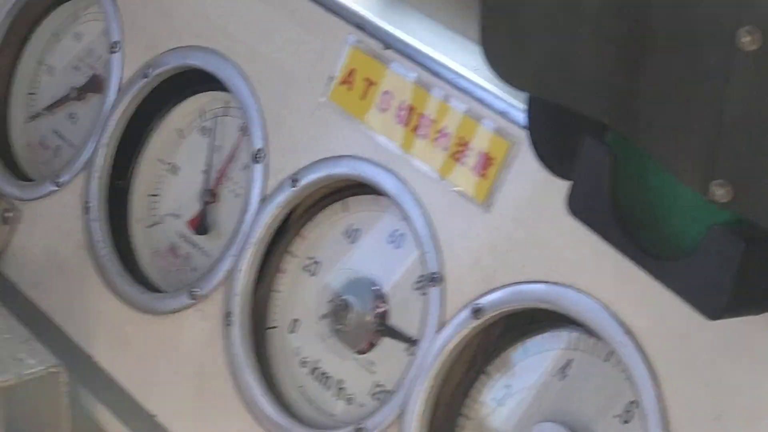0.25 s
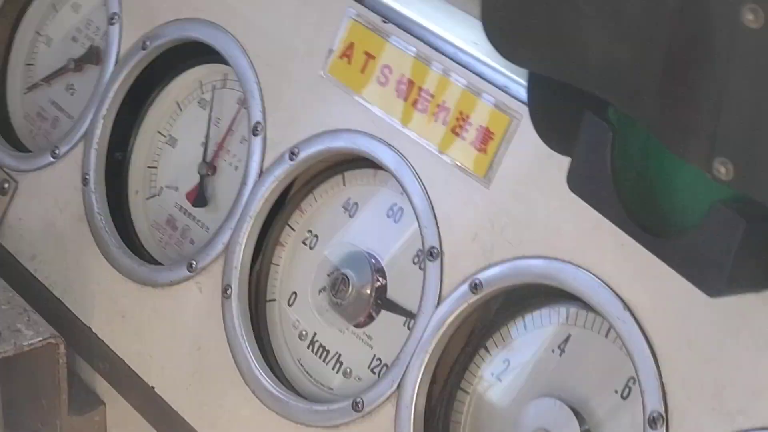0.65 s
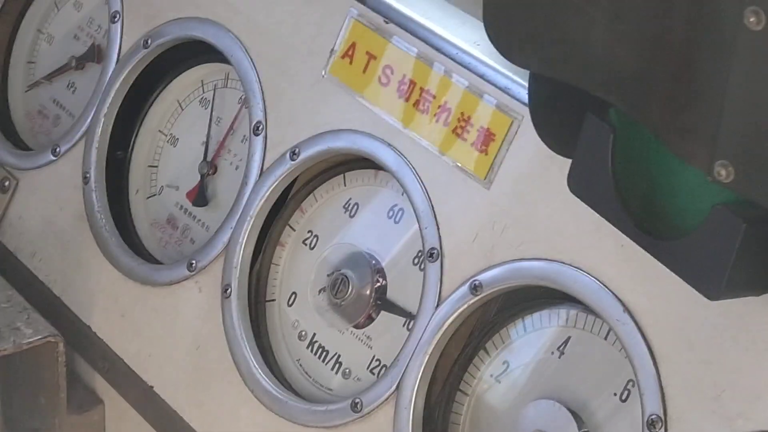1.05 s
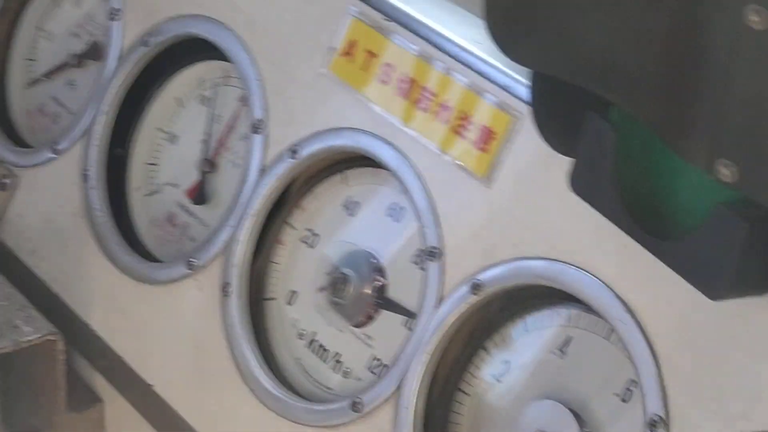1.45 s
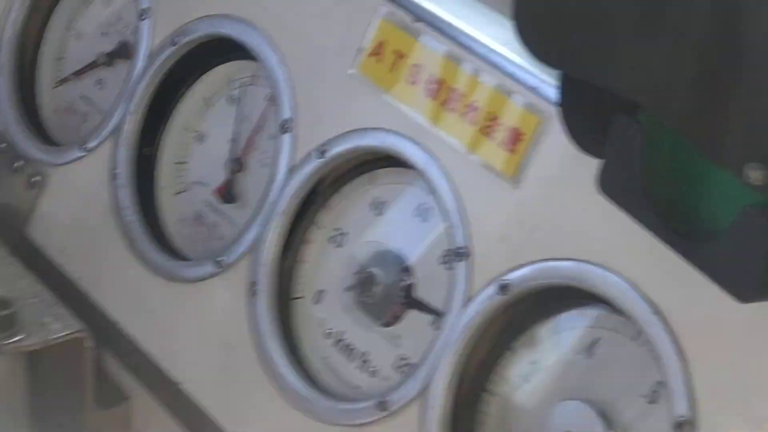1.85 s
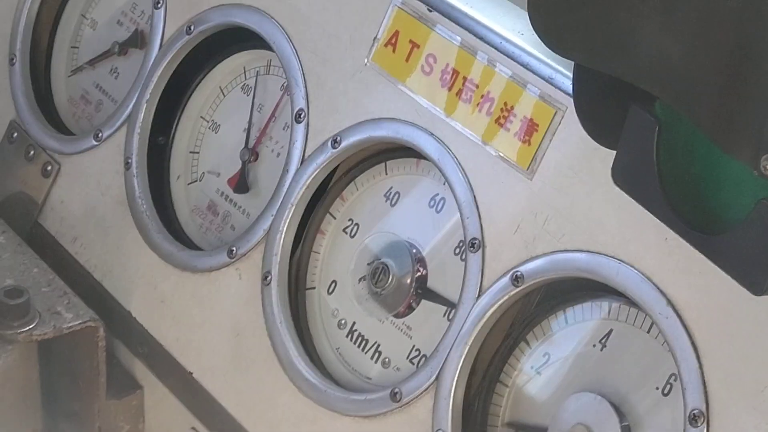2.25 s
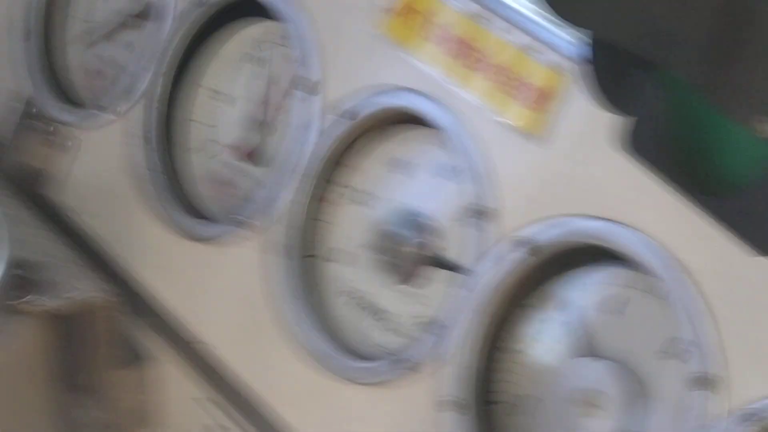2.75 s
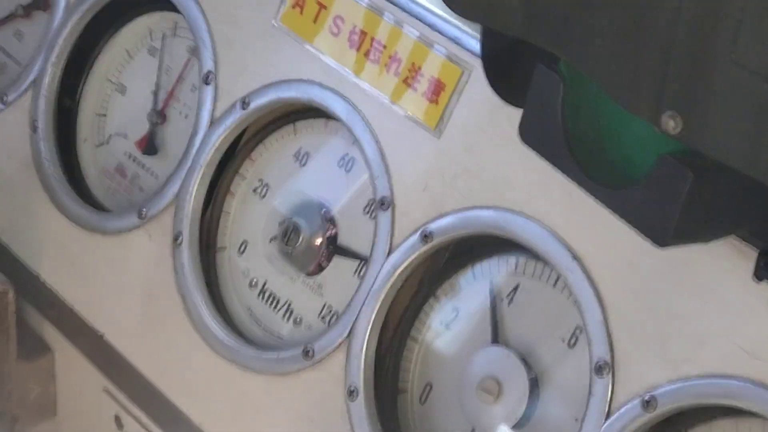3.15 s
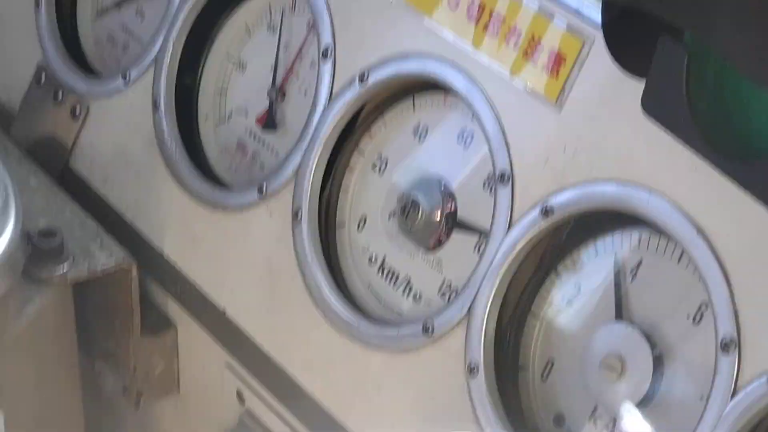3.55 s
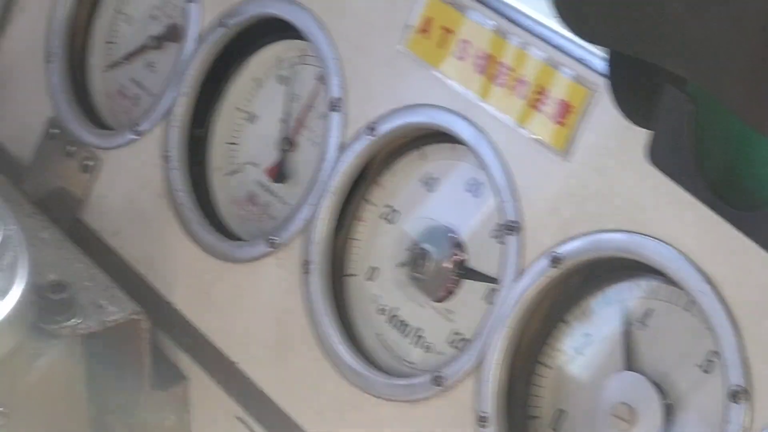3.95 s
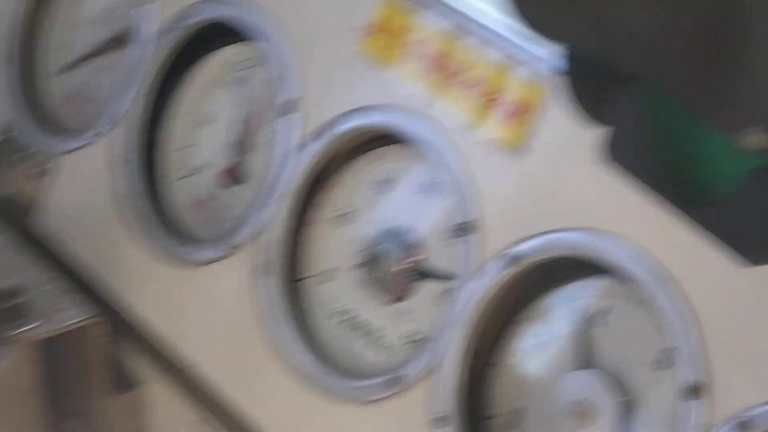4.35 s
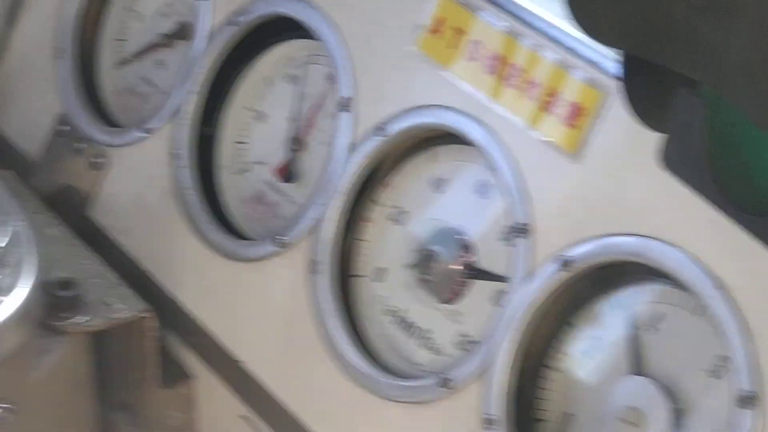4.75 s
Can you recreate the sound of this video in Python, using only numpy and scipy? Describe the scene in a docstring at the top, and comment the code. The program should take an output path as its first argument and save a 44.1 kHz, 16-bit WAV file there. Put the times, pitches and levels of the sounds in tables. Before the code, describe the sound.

An electric train runs fast, heard on board: steady wheel roar, a growling, slowly falling whine, irregular rail thumps and close metallic rattles.

```python
"""Wheels roar on rough rail, heard in the cab of an electric train running fast and slowly losing speed.
Rail joints thump up through the car body. The gears of two axles whine at close, falling pitches.
Loose metal fittings clatter and small things tick close to the microphone.
Underneath, small parts buzz, the steel wheels ring and faint ticks rustle."""
import sys
import numpy as np
from scipy import signal
from scipy.fft import rfft, irfft
from scipy.io import wavfile
from scipy.ndimage import uniform_filter1d, minimum_filter1d

SR = 44100
rng = np.random.default_rng(int(sys.argv[2]) if len(sys.argv) > 2 else 0)


def wav_record(signal):
    """Record a signal, one row per channel, as 16-bit PCM in the file named by sys.argv[1]."""
    frames = np.transpose(np.atleast_2d(signal))
    bounded = np.clip(frames, -1, 1)
    # unit amplitude maps onto the largest positive 16-bit level
    quanta = np.round(bounded * 32767).astype(np.int16)
    wavfile.write(sys.argv[1], SR, quanta)


N = 221249
TIME = np.arange(N) / SR


# Rolling noise. Each row: frequency in Hz, relative density in dB.
ROLL_SPECTRUM = [(15, -35), (25, -14), (75, -3), (188, -3.5), (274, -4.5), (741, -3.5), (804, -8),
                 (1300, -12.5), (1660, -15), (4150, -27.5), (4870, -36.5), (9050, -51.5), (10400, -58.5),
                 (12800, -53), (15500, -78)]
# Cab resonances. Each row: centre in Hz, width in Hz, gain in dB.
CAB_RESONANCES = [(74.6, 27, 5.5), (247.2, 98, 12.5), (373, 138, 11), (870, 70, 4), (2510, 59, 3.5),
                  (4710, 44, 7), (5830, 130, 7), (8970, 710, 6.5), (10070, 990, -15)]

def rolling():
    """Rough wheels on rough rail shake the cab; five bands swell and flutter with the track."""
    hz, field = cab_noise(ROLL_SPECTRUM, size=N)
    cab_db = sum(db / (1 + (2 * (hz - f) / width) ** 2) for f, width, db in CAB_RESONANCES)
    field = rfft(shimmer(irfft(field * amp(cab_db), N)))
    rough_db, bass_db, treble_db = track()
    bands = [(0, 150, -30.5 + bass_db, 1.6),  # body rumble
             (150, 450, -25 + .89 * rough_db, 1.5),  # floor drone
             (450, 1100, -27.5 + rough_db, 1),  # wheel roar
             (1100, 5000, -35 + .914 * rough_db, .8),  # rail hiss
             (5000, SR, -50.5 + treble_db, 1.4)]  # airy treble
    out = np.zeros((2, N))
    for low_hz, high_hz, level_db, flutter_db in bands:
        band = unit(irfft(field * ((hz >= low_hz) & (hz < high_hz)), N))
        out += band * amp(level_db + flutter_db * wander(hz=15.6))
    return out


# Shimmer of the rolling noise. Each row: frequency in Hz, rms depth in dB.
SHIMMER_DEPTH = [(300, .5), (1000, 2), (1800, 3.6), (9000, 3.8)]

def shimmer(x):
    """Narrow bands of the rolling noise swell and fade at random, about ten times a second."""
    frames = dict(fs=SR, nperseg=1024, noverlap=768)
    hz, _, spectra = signal.stft(x, **frames)
    patches = uniform_filter1d(rng.standard_normal(spectra.shape[1:]), size=3, axis=0)
    patches = unit(uniform_filter1d(patches, size=18, axis=1))
    swell_db = read(SHIMMER_DEPTH, hz)[:, None] * patches
    return signal.istft(spectra * amp(swell_db), **frames)[1][:, :N]


# Track under the car. Each row: time in seconds, roughness in dB, bass in dB, treble in dB.
TRACK_STATE = [(0.0, -19.5, -25, -49), (0.4, -19.5, -30, -48), (0.6, -21, -21.5, -47),
               (0.76, -18.5, -22.5, -47.5), (0.82, -21.5, -27, -52.5), (0.89, -22.5, -33.5, -51),
               (1.01, -23.5, -29, -52), (1.38, -26, -31, -47), (1.79, -27, -31.5, -55.5),
               (1.99, -26.5, -36, -52.5), (2.11, -32.5, -44, -52.5), (2.28, -30.5, -43, -56.5),
               (2.63, -32.5, -39.5, -59), (2.89, -27.5, -26, -53), (3.18, -30, -38, -50),
               (3.41, -32.5, -37, -53.5), (3.73, -31, -40.5, -57.5), (4.02, -26, -33.5, -56.5),
               (4.22, -26, -31.5, -52), (4.56, -27.5, -31, -52), (4.88, -28, -35, -53.5),
               (5.02, -23.5, -30.5, -54.5)]

def track():
    """Rail roughness, bass and treble, in dB about their averages."""
    return [db - db.mean() for db in follow(TRACK_STATE)]


# Wheels striking joints and uneven rail.
# Each row: start in seconds, boom peak in dB, boom pitch in Hz, knock in dB relative to that peak.
WHEEL_BLOWS = [(0.478, -11, 342, -5), (0.739, -8, 328, -3), (0.799, -6, 305, -8), (0.843, -10, 320, -21),
               (0.940, -7, 266, -11), (0.985, -11.5, 330, -1.5), (1.008, -1.5, 233, -16.5),
               (1.185, -3, 255, -11.5), (1.204, -11.5, 393, -10), (1.226, -9, 284, -22),
               (1.374, -7, 226, -14.5), (1.394, -9, 258, -11), (1.458, -10.5, 243, -22),
               (1.862, -13.5, 392, -27), (1.937, -5, 263.5, -7.5), (1.959, -11, 364, -2.5),
               (2.004, -3, 275, -8.5), (2.020, -2.5, 287, -20), (2.026, -7, 446, -11),
               (2.191, -4, 289, -11.5), (2.28, -10.5, 247, -16.5), (2.302, -16.5, 373, -2.5),
               (2.881, -3.5, 247, -19), (2.946, 0, 259, -21), (2.973, -10.5, 297, -23),
               (3.133, -8.5, 190, -17), (3.148, -10.5, 285, -16), (3.222, -11, 218, -24),
               (3.85, -16, 264, -11), (4.035, -7.5, 305, -5), (4.053, -10.5, 264, -13),
               (4.220, -4, 303, -10), (4.244, -4, 251, -28), (4.382, -19.5, 308, 0), (4.635, -7, 256, -4),
               (4.708, -21.5, 187, 3.5), (4.949, -15, 310, -4.5)]
# Hard knock. Each row: frequency in Hz, relative density in dB.
KNOCK_SPECTRUM = [(60, -27), (160, -31), (260, -24), (400, 11), (600, 4), (900, -1.5), (1400, -11.5),
                  (3000, -20), (7000, -36), (15000, -80)]
# Floor shudder. Each row: frequency in Hz, relative density in dB.
SHUDDER_SPECTRUM = [(25, -12), (65, -10), (105, 0), (180, -20.5), (600, -87)]

def joints():
    """Each wheel drops with a knock: the car body booms and the floor shudders a moment later."""
    t, out = np.arange(SR // 2) / SR, np.zeros((2, N))
    for start_s, db, hz, knock_db in WHEEL_BLOWS:
        boom_t60_s = .11 * np.exp(-.057 * db)  # harder blows die faster
        knock = amp(knock_db) * burst(KNOCK_SPECTRUM, t, t60_s=.19, rise_s=.0053)
        add(out, start_s, amp(db) * (boom(t, hz, boom_t60_s) + knock))
        shudder = burst(SHUDDER_SPECTRUM, t, t60_s=.14, rise_s=.0094)
        add(out, start_s + .0134, amp(db - 17.5) * shudder)
    return out


# Car body modes. Each row: frequency in Hz, level in dB, relative decay time.
BODY_MODES = [(185, -2.5, 0.097), (218.4, -1, .15), (241.7, -3.5, 0.17), (273.8, 0.5, 0.2),
              (310.6, 0.5, .11), (382, -3.5, .22), (487, -2, .12), (560, -13, .07)]

def boom(t, hz, t60_s):
    """The car body rings in the modes near the blow's pitch; peak 1."""
    rise_s, shake_db = .0046, 2.5
    mode_hz, mode_db, mode_decay = np.transpose(BODY_MODES)[:, :, None]
    mode_t60_s = t60_s * mode_decay / mode_decay.max()
    excitation = 1 / (1 + (np.log(mode_hz / hz) / .15) ** 2)
    detune = 1 + .02 * rng.standard_normal(mode_hz.shape)
    shake = uniform_filter1d(rng.standard_normal((len(BODY_MODES), len(t))), size=500)
    shake = unit(uniform_filter1d(shake, size=100))  # the rubbing wheel keeps shaking each mode
    decay = amp(mode_db + shake_db * shake - 60 * t / mode_t60_s)
    ring = (excitation * decay * np.sin(2 * np.pi * mode_hz * detune * t)).sum(0)
    ring *= 1 - np.exp(-(t / rise_s) ** 2)
    # panels radiate little below their first mode
    ring = signal.sosfilt(signal.butter(4, 170, "highpass", fs=SR, output="sos"), ring)
    return ring / abs(ring).max()


# Gear mesh of the near axle. Each row: time in seconds, frequency in Hz.
MESH_PITCH = [(0, 827.5), (1, 824.5), (1.8, 820.5), (2.5, 816), (2.95, 810.5), (3.85, 797.5), (4.4, 789.5),
              (5.02, 782)]
# Multiples of the mesh frequency: near axle, far axle, near octave, far octave.
MESH_ORDERS = [1, .974, 2, 1.949]
# Gear tones. Each row: time in seconds, then near axle, far axle and near octave in dB.
MESH_LEVELS = [(0, -35, -39, -39), (.2, -29.5, -39, -33.5), (.42, -39, -37, -31.5),
               (.65, -29.5, -29.5, -36), (.95, -38, -29, -35.5), (1.27, -36.5, -41, -43),
               (1.75, -35, -31, -34.5), (2, -38, -39, -40), (2.32, -45, -54, -54), (2.6, -37, -44, -55),
               (2.93, -31, -39, -48), (3.15, -40, -49, -48), (3.45, -38.5, -40, -52),
               (3.85, -32.5, -41, -43.5), (4.2, -28, -36, -52), (4.45, -34, -44, -51),
               (4.78, -30.5, -36, -46), (5.02, -36, -39, -48)]
# Fainter tones of drive and wheels.
# Each row: midpoint in seconds, length in seconds, multiple of the mesh, level in dB, waver as a fraction.
PASSING_TONES = [(1.5, .35, .835, -37, .004), (2.92, .3, 1.05, -35, .022), (3.7, 1.15, 1.115, -41, .005),
                 (4.784, 0.69, 1.04, -35.5, .008)]
# Standing wave in the cab. Each row: frequency in Hz, phase between the microphones in radians.
STANDING_WAVE = [(750, 0), (900, .2), (1500, -2.1), (1700, -2.1)]

def gears():
    """Two axles with slightly unequal wheels mesh at close pitches and beat into a growl."""
    mesh_hz, = follow(MESH_PITCH)
    near_db, far_db, octave_db = follow(MESH_LEVELS)
    levels_db = [near_db, far_db, octave_db, far_db - 13]
    tones = [(order, db, .003 / order) for order, db in zip(MESH_ORDERS, levels_db)]
    for middle_s, length_s, order, db, waver in PASSING_TONES:
        fade_db = 20 * (2 * (TIME - middle_s) / length_s) ** 4
        tones.append((order, db - fade_db, waver))
    out = np.zeros((2, N))
    for order, level_db, waver in tones:
        # uneven tooth contact roughens pitch and strength
        cycles = np.cumsum(order * mesh_hz * (1 + waver * wander(hz=30))) / SR
        strength = amp(np.maximum(level_db, -120) + 2.3 / order * wander(hz=25))
        # the swaying car shifts the standing wave
        apart_rad = read(STANDING_WAVE, order * mesh_hz) + .35 * wander(hz=4)
        out += np.sqrt(2) * np.sin(2 * np.pi * cycles + np.array([apart_rad, -apart_rad]) / 2) * strength
    return out * amp([[1.2], [-.4]])  # slightly left


# Clatters. Each row: start in seconds, level in dB, crash t60 in seconds, factor on the crash's
# frequencies, part name, ring in dB relative to the crash.
CLATTERS = [(0.9849, -21, 0.17, 0.46, "dull", -25), (1.298, -28.5, 0.44, 0.77, "bright", -19),
            (1.4647, -29, 0.53, 0.77, "bright", -10.5), (3.105, -33.5, 0.39, 0.74, "bright", -8),
            (3.4322, -19, 0.25, 0.91, "bright", -7), (3.678, -28, 0.3, 0.88, "bright", -14),
            (4.228, -30, 0.27, .7, "dull", -6.5), (4.5522, -22, 0.23, 0.42, "dull", -11),
            (4.6375, -29.5, 0.68, 0.97, "dull", -4), (4.659, -22.5, 0.32, 0.85, "dull", -11),
            (4.694, -27.5, .15, 0.76, "dull", -7), (4.7085, -26, 0.15, 0.48, "dull", -11),
            (4.738, -26.5, 0.15, 0.51, "dull", -7.5), (4.968, -35.5, 0.22, 1, "dull", -11)]
# Crash of a fitting. Each row: frequency in Hz before that factor, relative density in dB.
CRASH_SPECTRUM = [(550, -37), (850, 6), (1150, -11.5), (2200, 1.5), (3300, -4.5), (3900, -5.5), (4800, -4),
                  (7000, -21.5), (9000, -26.5), (15500, -47)]
# Modes of the "bright" and "dull" parts. Each row: frequency in Hz, level in dB, t60 in seconds.
PART_MODES = { "bright": [(1567, -5, .35), (2040, -1, .26), (2471, -5, .3), (2654, 0, .18), (2859, -5, .25),
              (3138, -1, .14), (3788, 0, .2), (3845, 0, .18), (3968, 0, .22), (4200, -4, .22),
              (5722, -7, .14)], "dull": [(1179, -4, .3), (1534, -5, .3), (1900, -3, .15), (2250, -2, .18),
              (2401, 2, .28), (2570, -1, .25), (3120, -5, .2), (3569, -4, .1), (4040, -3, .22),
              (4230, -3, .22), (5740, -11, .16)]}

def fittings():
    """Loose metal parts strike once, chatter in a grainy crash and ring on in close pairs of modes."""
    strike_s, rise_s, split_hz = .01, .0011, 30
    t, out = np.arange(SR // 2) / SR, np.zeros((2, N))
    crash_hz, crash_db = np.transpose(CRASH_SPECTRUM)
    treble_octaves = np.log2(np.maximum(crash_hz / 3000, 1))
    mean_db = np.mean([row[1] for row in CLATTERS])
    strike = np.exp(-t / strike_s)
    for start_s, db, t60_s, pitch, part, ring_db in CLATTERS:
        mode_hz, mode_db, mode_t60_s = np.transpose(PART_MODES[part])[:, :, None]
        phase, split = rng.random(size=(2, 2, 2, len(mode_hz), 1))
        pair_hz = mode_hz + split_hz * (split - .5)
        pairs = np.sin(2 * np.pi * (pair_hz * t + phase)).sum(0) / np.sqrt(2)
        ring = (amp(mode_db - 60 * t / mode_t60_s) * pairs).sum(1) * (1 - np.exp(-t / rise_s))
        chatter = amp(2.6 * (1 - strike) * grain(t, samples=130))
        tilt_db = .11 * treble_octaves * (db - mean_db)  # harder is brighter
        spectrum = np.transpose([crash_hz * pitch, crash_db + tilt_db])
        crash = (chatter + .4 * strike) * burst(spectrum, t, t60_s, rise_s)
        add(out, start_s, amp(db) * (crash + amp(ring_db) * ring))
    return out


# Ticks and scuffs close by. Each row: start in seconds, level in dB, t60 in seconds.
CLOSE_TICKS = [(0.166, -37.5, 0.24), (0.292, -36.5, 0.17), (0.476, -35, 0.22), (1.228, -42, 0.15),
               (1.757, -40.5, 0.06), (2.534, -42, .025), (2.643, -40, 0.17), (2.811, -40.5, 0.13),
               (2.867, -36, 0.018), (2.926, -37, 0.063), (3.03, -31.5, 0.13), (3.202, -39, 0.12),
               (3.309, -34, 0.021), (3.432, -37, 0.15), (3.95, -41.5, 0.51), (4.193, -34, 0.026),
               (4.213, -36.5, 0.25), (4.298, -39, 0.1), (4.371, -40.5, 0.31)]
# Tick noise. Each row: frequency in Hz, relative density in dB.
TICK_SPECTRUM = [(800, -59), (2500, 16.5), (6000, 11), (9000, 5), (10800, 0), (13300, 7), (14400, 3),
                 (15500, -16)]

def ticks():
    """Dry ticks start at once; scuffs swell for a moment and crackle as they die away."""
    t, out = np.arange(SR // 4) / SR, np.zeros((2, N))
    for start_s, db, t60_s in CLOSE_TICKS:
        swell_s = .11 * t60_s
        noise = unit(irfft(cab_noise(TICK_SPECTRUM, size=len(t))[1], len(t)))
        crackle = unit(amp(2.3 * grain(t, samples=40)))
        envelope = np.minimum(t / swell_s, amp(-60 * np.maximum(t - swell_s, 0) / t60_s))
        add(out, start_s, amp(db) * envelope * crackle * noise)
    return out


def buzzing_parts():
    """Small loose parts buzz at random, each near its own pitch, louder on rough rail."""
    taps_per_s = 28
    t, out = np.arange(SR // 8) / SR, np.zeros((2, N))
    for hz in np.geomspace(1750, 4300, num=9):
        taps = (rng.random(N) < taps_per_s / SR) * amp(rng.uniform(-8, 0, N))
        spectrum = [(hz * .7, -45), (hz * .9, -8), (hz, 0), (hz * 1.1, -8), (hz * 1.5, -40)]
        ring = burst(spectrum, t, t60_s=.14, rise_s=.002)
        out += signal.oaconvolve(taps[None], ring, axes=1)[:, :N] / hz  # smaller parts are fainter
    rough_db, _, _ = track()
    return unit(out) * amp(-40.5 + .46 * rough_db)


def wheel_ring():
    """The rail keeps the steel wheels ringing in narrow modes."""
    modes_hz, half_width_hz = [1790, 1892, 2200, 2479, 3128], 14
    hz = np.fft.rfftfreq(N, 1 / SR)
    response = sum(1 / f / (1 + ((hz - f) / half_width_hz) ** 2) for f in modes_hz)
    ring = unit(irfft(rfft(rng.standard_normal((2, N))) * response, N))
    rough_db, _, _ = track()
    return ring * amp(-44 + rough_db)


def rustle():
    """Faint ticks fall at random and follow the level of the treble."""
    ticks_per_s, voices = 51, 4
    t, out = np.arange(SR // 8) / SR, np.zeros((2, N))
    for chance, softness in rng.random(size=(voices, 2, N)):
        taps = (chance < ticks_per_s / (voices * SR)) * amp(-10 * softness)
        tick = burst(TICK_SPECTRUM, t, t60_s=.046, rise_s=.002)
        out += signal.oaconvolve(taps[None], tick, axes=1)[:, :N]
    _, _, treble_db = track()
    return unit(out) * amp(-61.5 + 1.5 * treble_db)


# Likeness at the two microphones. Each row: frequency in Hz, left-right correlation.
CAB_COHERENCE = [(60, 1), (300, 0.98), (640, 0.93), (900, 0.75), (1400, 0), (3000, 0), (15000, 0.14)]
# Stereo balance. Each row: frequency in Hz, left minus right in dB.
CAB_BALANCE = [(60, 0.2), (550, -0.1), (1100, 5), (2000, 2), (3500, 5), (5000, 0), (7200, -1), (9500, 21),
               (11500, -2), (15000, 5.5)]

def cab_noise(spectrum, size):
    """Frequencies and stereo spectra of a diffuse field: alike in the bass, unrelated in the treble."""
    hz = np.fft.rfftfreq(size, 1 / SR)
    left, other = rfft(rng.standard_normal((2, size)))
    coherence, tilt_db = read(CAB_COHERENCE, hz), read(CAB_BALANCE, hz) / 2
    right = coherence * left + np.sqrt(1 - coherence ** 2) * other
    # fine peaks and dips in the treble, different at each microphone
    grid_hz = np.arange(0, SR / 2, 28.)
    ripple = np.array([np.interp(hz, grid_hz, r) for r in rng.standard_normal((2, len(grid_hz)))])
    ripple_db = 2 * ripple * (1 - coherence)
    field = np.array([left * amp(tilt_db), right * amp(-tilt_db)])
    return hz, field * amp(read(spectrum, hz) + ripple_db)


def burst(spectrum, t, t60_s, rise_s):
    """A puff of coloured noise that swells and dies away."""
    noise = unit(irfft(cab_noise(spectrum, size=len(t))[1], len(t)))
    return noise * (1 - np.exp(-t / rise_s)) * amp(-60 * t / t60_s)


def grain(t, samples):
    """Noise smoothed over a number of samples; rms 1."""
    return unit(uniform_filter1d(rng.standard_normal(len(t)), size=samples))


def wander(hz):
    """Random drift, low-passed at hz; rms 1."""
    f = np.fft.rfftfreq(N, 1 / SR)
    return unit(irfft(rfft(rng.standard_normal(N)) / (1 + (f / hz) ** 4), N))


def amp(db):
    """Decibels to gain."""
    return 10 ** (np.asarray(db) / 20)


def unit(x):
    """Scales to rms 1."""
    return x / np.sqrt(np.mean(x ** 2) + 1e-20)


def read(points, hz):
    """Interpolates on a log-frequency axis."""
    f, value = np.transpose(points)
    return np.interp(np.log(hz + 1), np.log(f), value)


def follow(rows):
    """Each column of a time table, sample by sample."""
    times_s, *columns = np.transpose(rows)
    return [np.interp(TIME, times_s, column) for column in columns]


def add(mix, start_s, sound):
    """Mixes in a stereo sound."""
    part = mix[:, round(start_s * SR):][:, :sound.shape[-1]]
    part += sound[..., :part.shape[1]]


def scene():
    """Everything heard in the cab."""
    return rolling() + wheel_ring() + gears() + joints() + fittings() + buzzing_parts() + ticks() + rustle()


def record(dry):
    """A quick limiter holds the loudest thumps at full scale; a low-pass follows."""
    allowed_gain = 1 / np.maximum(abs(dry).max(0), 1)
    gain = uniform_filter1d(minimum_filter1d(allowed_gain, size=200), size=200)
    lowpass = signal.firwin(511, cutoff=15750, window=("kaiser", 9), fs=SR)
    return signal.oaconvolve(dry * gain, lowpass[None], "same")


dry = scene()
out = record(dry)
wav_record(out)
```